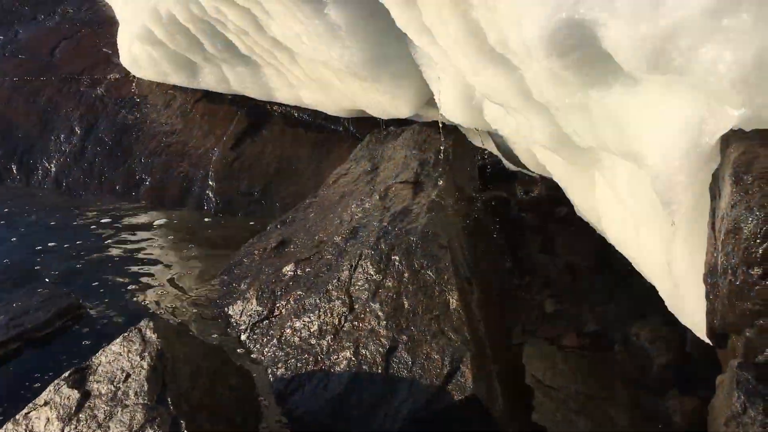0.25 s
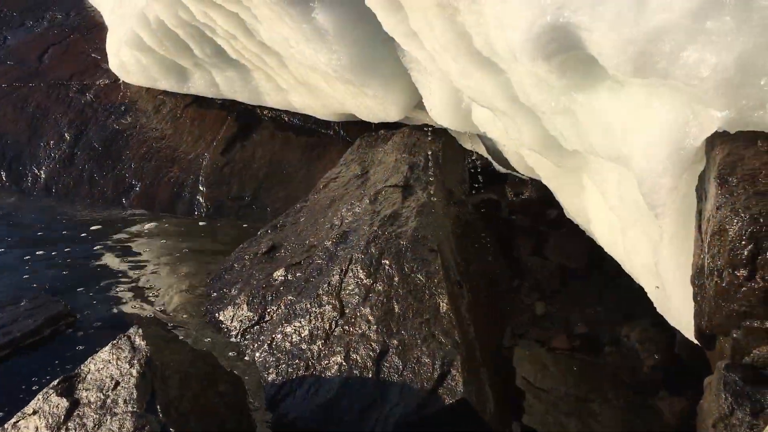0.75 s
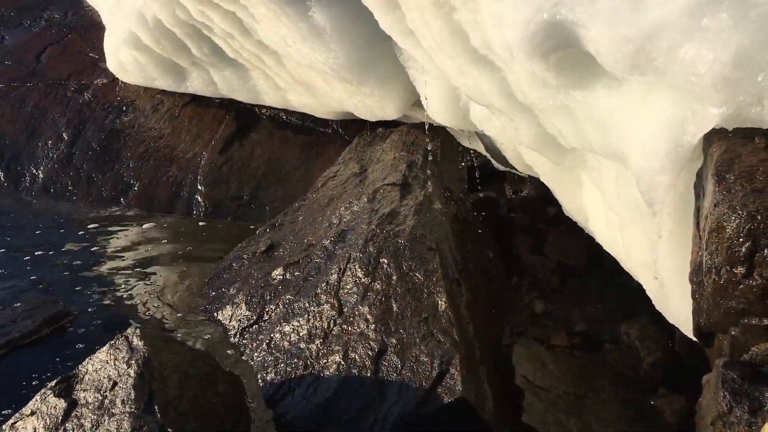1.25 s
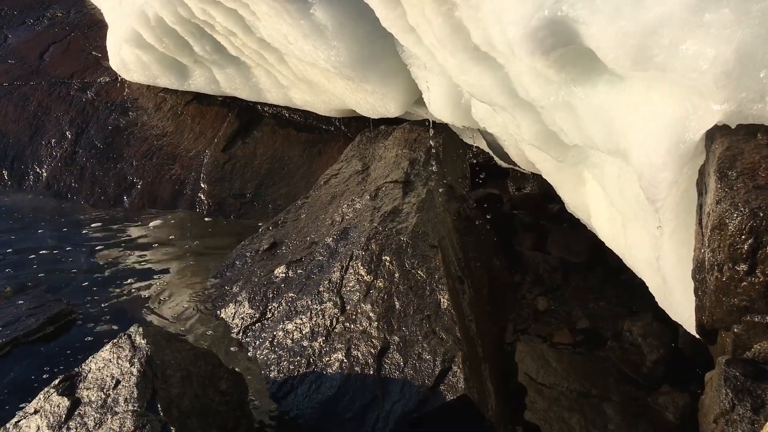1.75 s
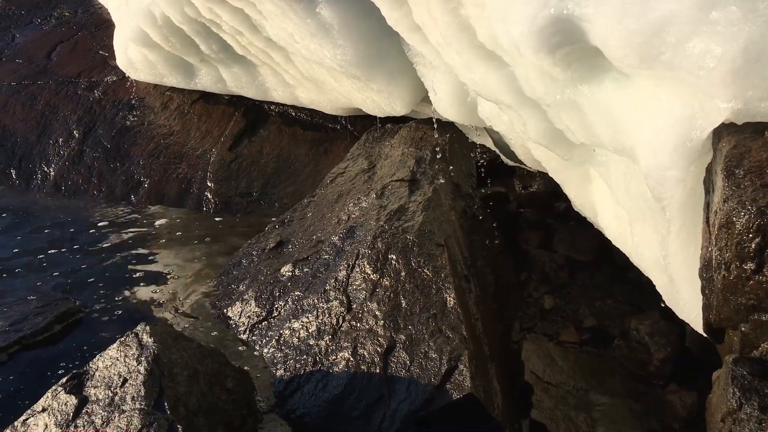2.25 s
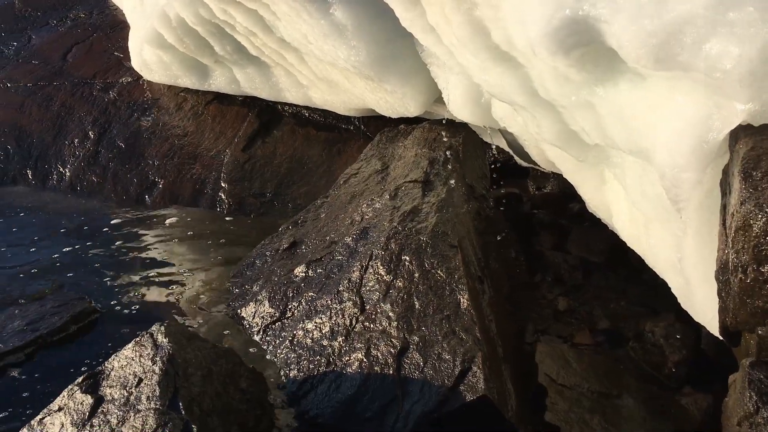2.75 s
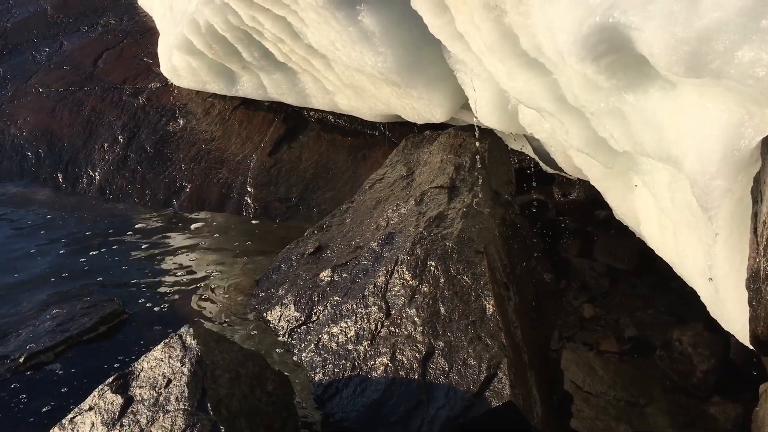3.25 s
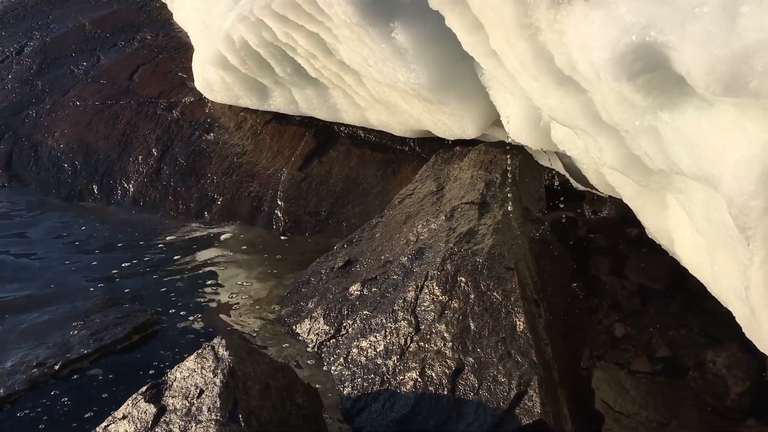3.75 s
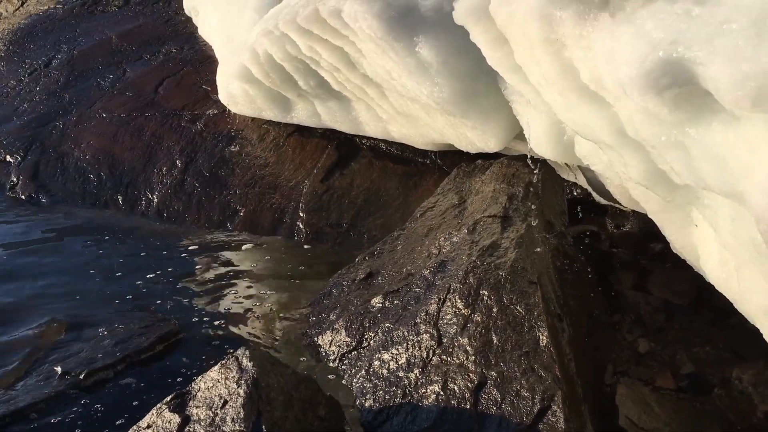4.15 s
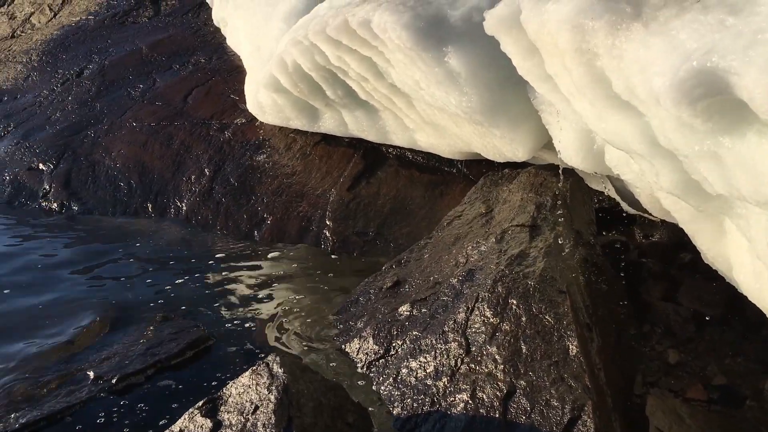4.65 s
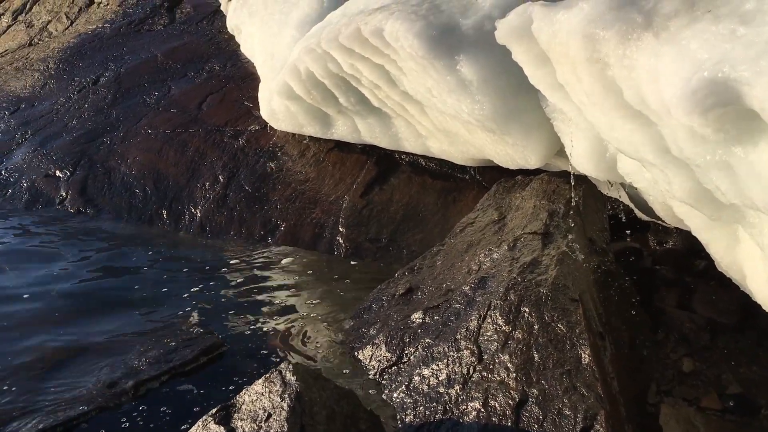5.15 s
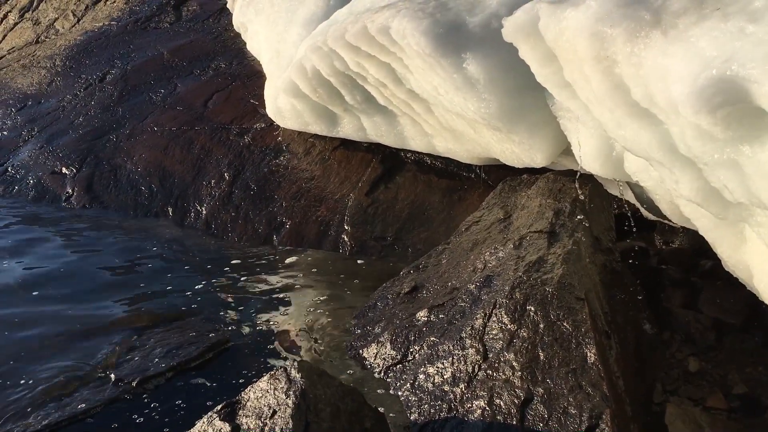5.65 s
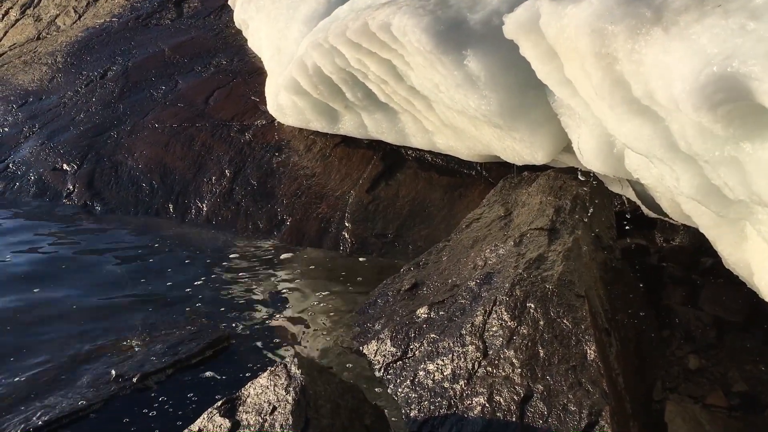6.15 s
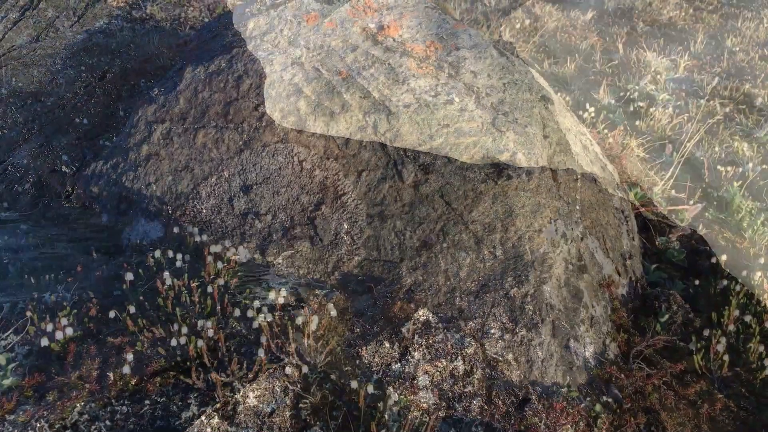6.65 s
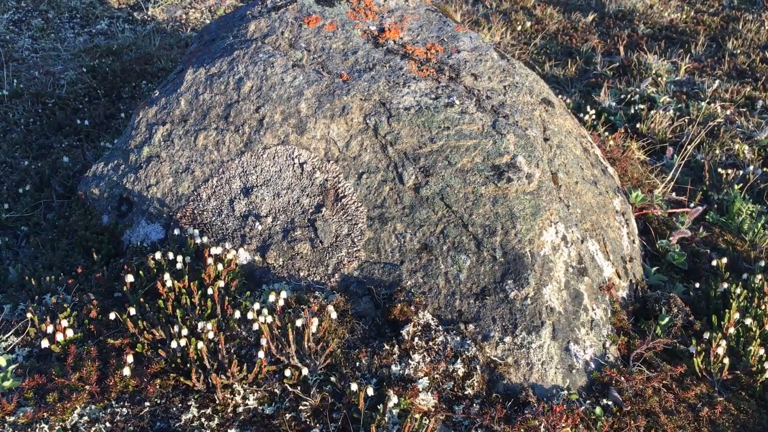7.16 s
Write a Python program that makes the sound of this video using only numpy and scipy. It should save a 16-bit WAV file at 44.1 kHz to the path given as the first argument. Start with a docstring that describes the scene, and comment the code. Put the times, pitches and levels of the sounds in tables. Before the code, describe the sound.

Meltwater drips and trickles from ice onto wet rocks and into a pool, with low wind rumbling on the microphone.

```python
"""On an icy shore, meltwater drips from a ledge, slaps on wet rock and plinks into the pool below. A slap is a
drop bursting on stone; a plink is a tiny trapped bubble ringing inside a splash. Under them run a fine patter
of small drops and spray, a far murmur, and wind on the microphone. Near the end the scene changes: the shore
dissolves into thin wind over open ground."""
import sys
import numpy as np
from scipy import signal
from scipy.fft import rfft, irfft, next_fast_len
from scipy.io import wavfile
from scipy.ndimage import uniform_filter1d, map_coordinates

SR = 44100
rng = np.random.default_rng(int(sys.argv[2]) if len(sys.argv) > 2 else 0)


def generate_wav(sig):
    """Save sig (samples, or channels by samples) to the path in sys.argv[1] as 16-bit PCM at SR."""
    pcm = np.round(np.clip(np.atleast_2d(sig).T, -1, 1) * 32767).astype(np.int16)
    wavfile.write(sys.argv[1], SR, pcm)


N = 326781

# Levels in the tables are relative; each layer gets its final loudness further down.
# tone of far wind and water: f/Hz, level/dB
SHORE_TONE = [(90, -24), (170, 1.5), (240, -4.5), (325, 2), (475, -8.5), (585, -1.5), (740, -10.5),
              (900, -3.5), (1250, -9), (1550, -11.5), (2100, -17), (3200, -24.5), (5000, -38), (12000, -74)]
# tone of thin wind over land: f/Hz, level/dB
OPEN_GROUND_TONE = [(100, -23), (240, 0.5), (320, -1), (440, -12.5), (650, -4.5), (1000, -1.5),
                    (1450, -4.5), (2400, -15), (3800, -23.5), (5000, -35.5), (15000, -33)]
# strength of the wind on the microphone: t/s, level/dB
GUSTS = [(0.0, -35.5), (0.37, -40.5), (0.91, -39.5), (1.71, -38.5), (2.33, -32.5), (2.64, -37.5),
         (3.01, -38), (3.36, -38), (3.8, -42.5), (4.33, -35.5), (4.64, -38.5), (5.51, -37), (5.66, -34),
         (5.92, -40), (6.31, -38), (6.56, -43.5), (7.14, -49), (7.41, -43)]
# tone of its rumble: f/Hz, level/dB
RUMBLE_TONE = [(15, -35), (30, -22.5), (45, -2), (63, -2.5), (95, -6.5), (135, -13), (200, -26),
               (400, -41.5), (900, -82)]
# swirls of air that thump the microphone: t/s, level/dB, f/Hz
SWIRLS = [(0.05, -31.5, 165), (2.088, -22, 67), (2.152, -23.5, 108), (2.212, -19, 101), (2.26, -24, 79),
          (2.293, -16, 82), (2.328, -19, 89.5), (2.341, -21, 62), (2.354, -19.5, 150), (2.383, -24.5, 118),
          (2.421, -20.5, 72), (2.472, -22, 65), (2.519, -28, 130), (2.592, -29, 150), (2.63, -24.5, 61.5),
          (3.109, -24.5, 79), (3.169, -32, 139), (3.264, -21, 70), (3.42, -25, 70.6), (3.518, -24.5, 64),
          (4.498, -18, 55), (5.157, -20.5, 65.6), (5.197, -25, 62.5), (5.779, -20, 78.5), (5.818, -23, 133),
          (6.16, -26, 55), (6.323, -23.5, 64), (6.373, -25, 60)]
# tone of the air breaking up around them: f/Hz, level/dB
FLUTTER_TONE = [(50, -12), (110, 0), (240, 0), (370, -5), (480, -19), (800, -36), (1500, -80)]
# how long the hollow under the ice echoes: f/Hz, t60/s (time to die away by 60 dB)
ECHO_TIMES = [(1000, 0.058), (4000, 0.066), (15000, 0.039)]
# strength of the trickle: t/s, level/dB
TRICKLE_FLOW = [(0.0, -47.5), (0.23, -48), (2.39, -49), (2.53, -51), (3.56, -45.5), (3.81, -47),
                (6.3, -48.5)]
# a string of drops lets go and the patter swells: t/s, rise/dB
DROP_SPURTS = [(1.5, 3.5), (1.91, 7), (2.89, 4.5), (3.69, 5), (4.61, 4), (4.79, 3.5)]
# tone of spray and ticks: f/Hz, level/dB
FIZZ_TONE = [(2000, 1), (5000, -12.5), (7000, -7.5), (9500, 0), (10400, -5), (11200, 0.5), (16000, -1)]
# tone of splashes on rock: f/Hz, level/dB
ROCK_TONE = [(1500, 6), (3000, -20), (5000, -12), (6200, 3), (7500, -3), (9500, 1.5), (10400, -6.5),
             (11200, -2), (15500, -0.5), (17000, 2)]
# tone of splashes in the pool: f/Hz, level/dB
POOL_TONE = [(2000, -1.5), (4100, 0.5), (5000, -5.5), (6200, 5), (7500, -1), (12000, 5.5)]
# larger bubbles that ring on: t/s, level/dB, f/Hz, t60/s
BIG_BUBBLES = [(1.392, -45, 3320, .032), (1.6, -50, 2810, .047), (2.221, -44, 3480, .026),
               (3.146, -37, 1378, 0.1), (3.531, -36, 2100, .024), (3.536, -37, 2370, .04),
               (3.917, -42.5, 3360, 0.042), (4.312, -44, 1620, 0.062), (4.716, -38, 2435, .055),
               (5.112, -36.5, 1410, .04), (5.117, -34, 1630, 0.036), (6.283, -36.5, 1505, 0.068),
               (6.374, -29.5, 2120, 0.017)]
# drops that plink into the pool: t/s, level/dB, f/Hz
POOL_DROPS = [(0.0852, -33.5, 3800), (0.2773, -26, 4480), (0.3594, -32, 3850), (0.404, -24.5, 5200),
              (0.545, -29, 4800), (0.575, -32, 4220), (0.7386, -25.5, 2580), (0.9332, -27.5, 4280),
              (1.1934, -33.5, 2390), (1.3112, -28, 4400), (1.4334, -30, 3500), (2.148, -32, 5540),
              (2.307, -29.5, 3800), (2.3595, -31.5, 3180), (2.811, -31, 5600), (3.121, -31.5, 4450),
              (3.4445, -26.5, 4200), (3.523, -23.5, 3970), (3.554, -28.5, 3030), (3.7409, -28, 3330),
              (3.8674, -32, 4500), (4.0302, -22.5, 3220), (4.0761, -27, 4050), (4.2284, -25, 3660),
              (4.357, -30.5, 3600), (4.4764, -26.5, 4760), (4.4987, -23.5, 5200), (4.544, -26, 3100),
              (4.6248, -23, 4900), (4.783, -34, 4260), (4.9488, -27.5, 4700), (5.0575, -30, 4600),
              (5.14, -34, 2450), (5.393, -29.5, 4470), (5.5475, -25.5, 4160), (5.5908, -28, 5600),
              (5.5974, -29.5, 2920), (5.683, -26, 3470), (5.7126, -26, 2850), (5.9878, -21.5, 5150),
              (6.013, -26.5, 3550), (6.097, -26, 4970), (6.4595, -30.5, 5150)]
# big drops on rock, and the pitch of their water film: t/s, level/dB, f/Hz
ROCK_DROPS = [(0.1185, -24, 8400), (0.315, -19, 9400), (0.4732, -18.5, 8600), (0.5197, -13.5, 14600),
              (0.5591, -26, 13200), (1.111, -26, 9460), (1.4785, -20, 8700), (1.8013, -16.5, 14900),
              (1.9066, -22, 8700), (2.0433, -26.5, 7810), (2.12, -25.5, 6700), (2.1765, -22.5, 11000),
              (2.2897, -21, 6200), (2.4894, -21, 12800), (2.5831, -21, 9440), (2.8075, -23, 12200),
              (2.834, -23, 14700), (2.8529, -23.5, 9580), (2.989, -19.5, 6640), (3.202, -29, 7800),
              (3.26, -18, 12100), (3.3807, -28, 6230), (3.4212, -22, 7440), (3.5017, -23, 5800),
              (3.6413, -30, 6680), (3.693, -26, 11400), (3.8571, -28, 5990), (3.9335, -19.5, 13700),
              (3.992, -20, 12100), (4.004, -25, 6950), (4.2278, -22.5, 6260), (4.7666, -20, 14000),
              (4.7867, -26, 7000), (4.8624, -21, 11500), (5.5002, -26.5, 5900), (5.5776, -23, 10000),
              (5.7109, -25, 9490), (5.7944, -26, 14000), (5.907, -20.5, 12500), (6.0661, -28, 9580),
              (6.1729, -24.5, 6100), (6.411, -24, 13200), (6.617, -28, 8250), (6.6558, -25, 14200)]

TIME = np.arange(N) / SR
FADE_END_S, FADE_S = 7.185, 0.97  # the scene dissolves from the shore to open ground
SHORE_DB, SHORE_EASE_DB_PER_S, OPEN_GROUND_DB = -42.5, 0.21, -52
RUMBLE_DB, SPRAY_DB, PATTER_DB, PLINK_DB, SLAP_DB = 3.5, -1.5, 1.55, 1.5, -1  # layer gains
FLUTTER_DB, FLUTTER_S, FAST_SWIRL_HZ = -15, .016, 126
STRAYS_PER_S, STRAY_OVER_FLOW_DB, STRAY_HZ = 9, 14.5, 5480
SPURT_S = .04  # about half the length of a spurt
TOP_HZ = 15950


def amp(db):
    """Turn decibels into a gain."""
    return 10 ** (np.asarray(db) / 20)


def unit(x):
    """Scale x to an average strength (rms) of 1."""
    return x / np.sqrt(np.mean(x ** 2) + 1e-20)


def along(points, hz):
    """Read between (f/Hz, value) points, with octaves evenly spaced."""
    f, v = np.transpose(points)
    return np.interp(np.log(hz + 1), np.log(f + 1), v)


def level(rows):
    """Turn (t/s, level/dB) rows into one gain per sample."""
    s, db = np.transpose(rows)
    return amp(np.interp(TIME, s, db))


def wobble(rate):
    """A smooth curve through rate random values a second."""
    values = rng.standard_normal(int(N * rate / SR) + 4)
    return map_coordinates(values, [np.arange(N) * rate / SR])


def filtered(x, response):
    """Scale each frequency in x by response(hz)."""
    size = next_fast_len(len(x) + 4096)
    hz = np.fft.rfftfreq(size, 1 / SR)
    return irfft(rfft(x, size) * response(hz), size)[:len(x)]


def coloured(x, tone):
    """Shape x with a tone table."""
    return filtered(x, lambda hz: amp(along(tone, hz)))


def rush(tone):
    """Steady noise with the given tone."""
    return unit(coloured(rng.standard_normal(N), tone))


def add(track, s, sound):
    """Mix a sound into the track at s seconds."""
    part = track[max(0, round(s * SR)):][:len(sound)]
    part += sound[:len(part)]


def shore_fade():
    """Gain of the shore sounds: full, then a straight fade to nothing."""
    return np.clip((FADE_END_S - TIME) / FADE_S, 0, 1)


def far_murmur():
    """Far wind and water murmur; as they fade, wind over open ground takes their place."""
    fade = shore_fade()
    shore_db = SHORE_DB - SHORE_EASE_DB_PER_S * TIME + 0.85 * wobble(7.6)
    shore = fade * amp(shore_db) * rush(SHORE_TONE)
    open_ground = np.sqrt(1 - fade) * amp(OPEN_GROUND_DB) * rush(OPEN_GROUND_TONE)
    return shore + open_ground


def wind_rumble():
    """Wind rumbles on the microphone; the noise is evened out so the gusts set its swell."""
    rumble = rush(RUMBLE_TONE)
    chance_swell = np.sqrt(np.abs(uniform_filter1d(rumble ** 2, size=SR // 9)))
    return amp(RUMBLE_DB) * level(GUSTS) * rumble / chance_swell


def wind_thumps():
    """A swirl of air pushes and pulls the microphone once or twice; faster ones hit harder."""
    out = np.zeros(N)
    lead = SR // 20
    t = np.arange(-lead, lead) / SR
    push = lambda hz: np.sin(2 * np.pi * (hz * t + rng.random())) * np.exp(-(hz * t / 0.78) ** 2)
    for s, db, hz in SWIRLS:
        hard_edge = min(.7, (hz / 150) ** 2) * push(2.14 * hz)
        add(out, s - lead / SR, amp(db) * (1.2 * push(hz) + hard_edge))
    return out


def wind_flutter():
    """The air breaks up around each swirl, far more so at the fast ones."""
    power = np.zeros(N)
    for s, db, hz in SWIRLS:
        strength = amp(db) * (hz / FAST_SWIRL_HZ) ** 2
        power += strength ** 2 * np.exp(-((TIME - s) / FLUTTER_S) ** 2)
    return amp(FLUTTER_DB) * np.sqrt(power) * rush(FLUTTER_TONE)


def hollow(sound, echo_db, gap_s):
    """Rock and ice echo after a short gap, differently for each spot where a drop lands."""
    hz, t, bands = signal.stft(rng.standard_normal(SR // 22), SR, nperseg=128)
    decay = amp(-60 * t / along(ECHO_TIMES, hz)[:, None])
    echo = signal.istft(bands * decay, SR, nperseg=128)[1]
    echo *= 1 - np.exp(-(np.arange(len(echo)) / SR / gap_s) ** 2)
    echo *= amp(echo_db) / np.linalg.norm(echo)
    echo[0] += 1  # the direct sound
    return signal.fftconvolve(sound, echo)


def bubble(hz, t60, glide, attack_s):
    """A trapped bubble rings briefly; its pitch creeps up as it nears the surface."""
    t = np.arange(SR // 20) / SR
    note = np.sin(2 * np.pi * hz * (t + glide * t * t / t60))
    ring = note * amp(-60 * t / t60) * (1 - np.exp(-t / attack_s))
    return ring / np.abs(ring).max()


def splash(hz, t60, db_per_octave):
    """A drop snaps through the surface and its crater breaks up: a hiss from about hz upward."""
    t = np.arange(SR // 25) / SR
    snap = 1.6 * amp(-60 * t / .004)
    burst = rng.standard_normal(len(t)) * (snap + amp(-60 * t / t60))
    tone = [(.48 * hz, -26), (.78 * hz, 0), (1.5 * hz, 0),
            (3 * hz, db_per_octave), (6 * hz, 2 * db_per_octave)]
    hiss = coloured(burst, tone)
    return hiss / np.abs(hiss).max()


def plink(hz):
    """A drop into the pool rings a small bubble inside its splash."""
    drop = .5 * bubble(hz, t60=32 / hz, glide=.03, attack_s=.0001)
    add(drop, 0, splash(hz, t60=80 / hz, db_per_octave=-12.5))
    return drop / np.abs(drop).max()


def slap(hz, t60, width_hz, hiss_gain):
    """A drop bursts on wet stone: a crack, boosted where its film of water rings."""
    t = np.arange(SR // 100) / SR
    burst = rng.standard_normal(len(t)) * amp(-60 * t / t60)
    film = lambda f: hiss_gain + 1j * f * width_hz / (hz * hz - f * f + 1j * f * width_hz)
    crack = coloured(filtered(burst, film), ROCK_TONE)
    return crack / np.abs(crack).max()


def impact_tick(gain_db=-13, t60=0.0048):
    """A short dry tick that sharpens the start of a big drop's splash."""
    t = np.arange(SR // 200) / SR
    tick = coloured(rng.standard_normal(len(t)) * amp(-60 * t / t60), FIZZ_TONE)
    return amp(gain_db) * tick / np.abs(tick).max()


def spray(per_s, spread_db):
    """Droplets thrown off the rock fall back as a fine fizz."""
    hits = (rng.random(N) < per_s / SR) * rng.standard_normal(N)
    return unit(coloured(hits * amp(spread_db * wobble(70)), FIZZ_TONE))


def patter(per_s, spread_db, pool_share, count=1200):
    """Small drops land at random: most slap on the rock, some plink into the pool."""
    out = np.zeros(N)
    times = np.cumsum(rng.gamma(2, 1 / (2 * per_s), count))
    traits = rng.standard_normal((count, 3)).clip(-1.8, 1.4)
    for s, (size, pitch, depth), spot in zip(times, traits, rng.random(count)):
        if s > N / SR:
            break
        if spot < pool_share:
            drop = .55 * plink(6800 * np.exp(.17 * pitch))
        else:
            drop = slap(12000 * np.exp(.2 * pitch), t60=.009, width_hz=3000, hiss_gain=.12)
        shade_db = 1.12 * depth  # deep drops arrive weaker, but their echo stays as loud
        add(out, s, amp(spread_db * size - shade_db) * hollow(drop, echo_db=shade_db, gap_s=0.00089))
    return unit(out)


def stray_drops(spread_db, pitch_spread, count=110):
    """Lighter drops reach the pool at uneven times, each with its own size and pitch."""
    out = np.zeros(N)
    times = np.cumsum(rng.gamma(2, 1 / (2 * STRAYS_PER_S), count))
    for s, (size, pitch) in zip(times, rng.standard_normal((count, 2)).clip(-1.5, 1.5)):
        drop = hollow(plink(STRAY_HZ * np.exp(pitch_spread * pitch)), echo_db=1.5, gap_s=0.001)
        add(out, s, amp(STRAY_OVER_FLOW_DB + spread_db * size) * drop)
    return coloured(out, POOL_TONE)


def trickle():
    """The flow of meltwater sets how loud patter, spray and stray drops are; spurts swell the first two."""
    spurt_db = sum(db * np.exp(-((TIME - s) / SPURT_S) ** 2) for s, db in DROP_SPURTS)
    drops = amp(PATTER_DB) * patter(per_s=110, spread_db=2.4, pool_share=.3)
    fizz = amp(SPRAY_DB) * spray(per_s=7000, spread_db=1.5)
    swell = amp(spurt_db + 0.45 * wobble(11))
    strays = stray_drops(spread_db=2.5, pitch_spread=0.13)
    return level(TRICKLE_FLOW) * shore_fade() * (swell * (drops + fizz) + strays)


def big_bubbles():
    """Larger bubbles sing a slightly rising note while the water closes over them."""
    out = np.zeros(N)
    for s, db, hz, t60 in BIG_BUBBLES:
        note = bubble(hz, t60, glide=0.092, attack_s=0.00076)
        add(note, 0, amp(2) * splash(hz, t60=0.071, db_per_octave=-3.5))
        add(out, s, amp(db) * hollow(note, echo_db=-4.5, gap_s=0.0015))
    return out


def pool_plinks():
    """Heavier drops plink into the pool and echo in the hollow."""
    out = np.zeros(N)
    for s, db, hz in POOL_DROPS:
        drop = hollow(plink(hz), echo_db=-3, gap_s=0.00035)
        add(drop, 0, impact_tick())
        add(out, s, amp(db + PLINK_DB) * drop)
    return coloured(out, POOL_TONE)


def rock_slaps():
    """Big drops hit the rock close by; the lower the film rings, the longer the crack."""
    out = np.zeros(N)
    for s, db, hz in ROCK_DROPS:
        crack = slap(hz, t60=80 / hz, width_hz=2000, hiss_gain=.16)
        drop = hollow(crack, echo_db=-4, gap_s=.001)
        add(drop, 0, impact_tick())
        add(out, s, amp(db + SLAP_DB) * drop)
    return out


def scene():
    """Dripping water in the wind, on one channel."""
    water = pool_plinks() + big_bubbles() + rock_slaps() + trickle()
    return (water + wind_rumble() + wind_thumps() + wind_flutter() + far_murmur())[None]


def record(dry):
    """The camera keeps no treble above TOP_HZ."""
    return filtered(dry[0], lambda hz: hz < TOP_HZ)[None]


dry = scene()
out = record(dry)
generate_wav(out)
```